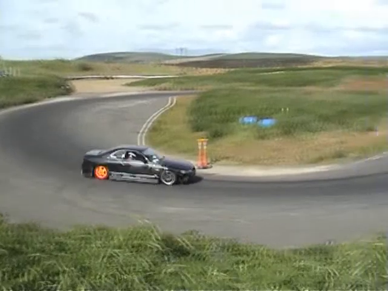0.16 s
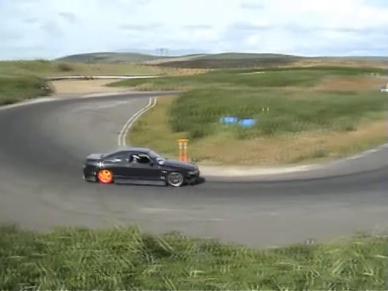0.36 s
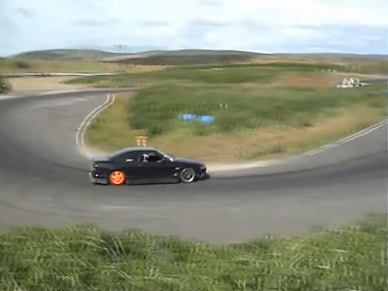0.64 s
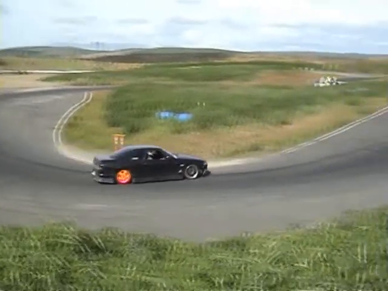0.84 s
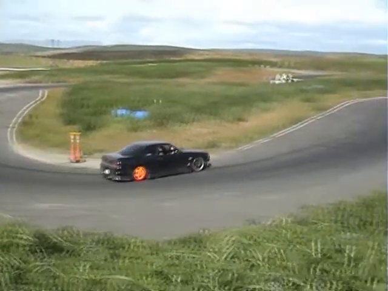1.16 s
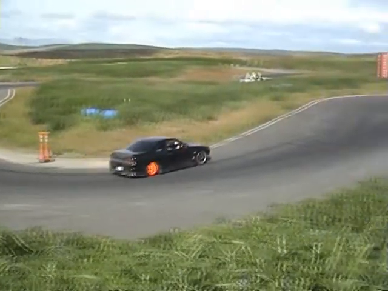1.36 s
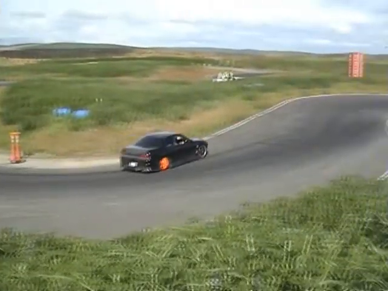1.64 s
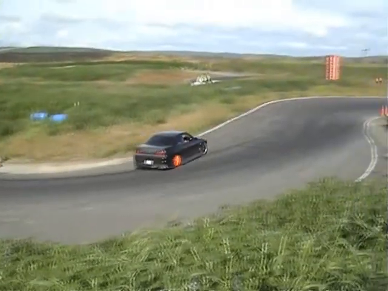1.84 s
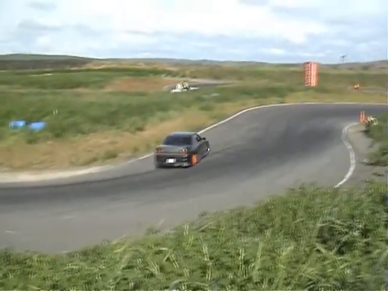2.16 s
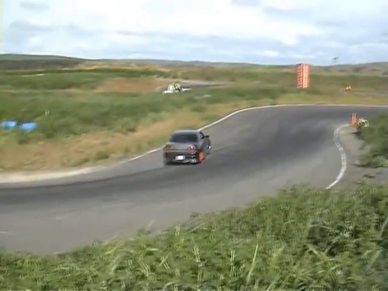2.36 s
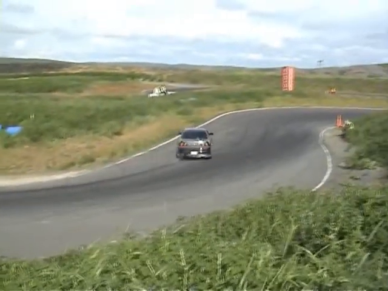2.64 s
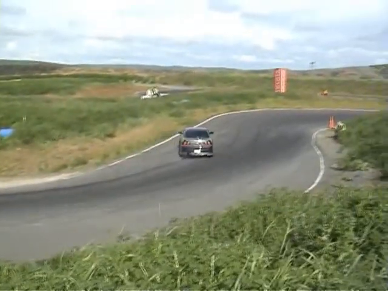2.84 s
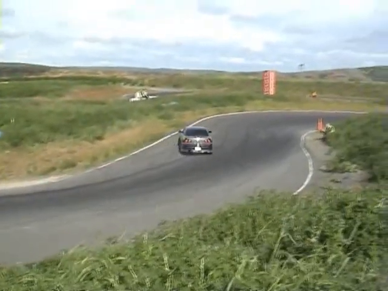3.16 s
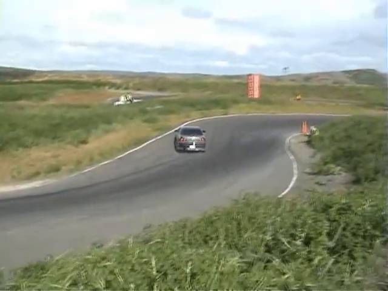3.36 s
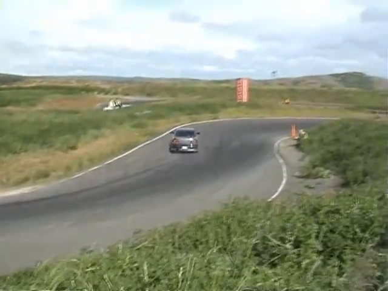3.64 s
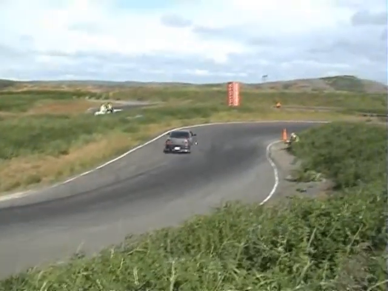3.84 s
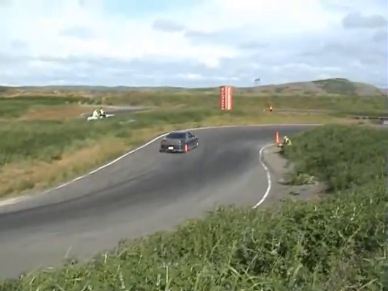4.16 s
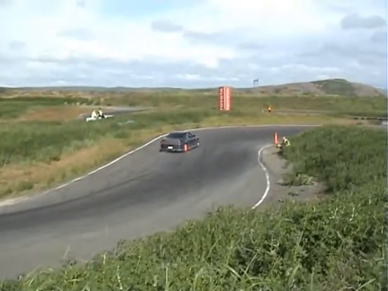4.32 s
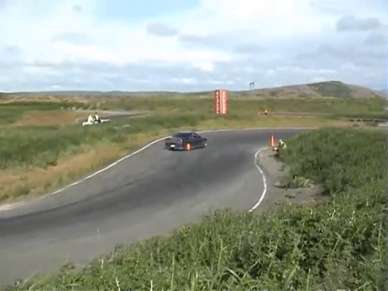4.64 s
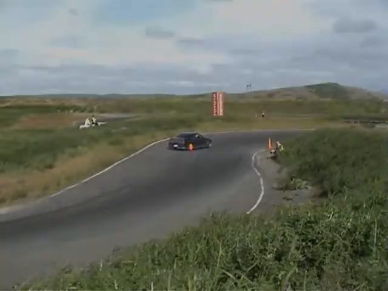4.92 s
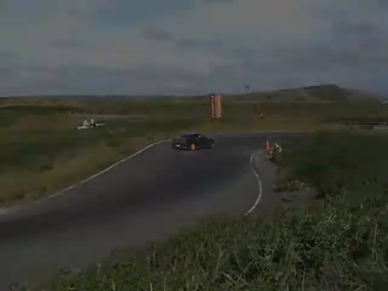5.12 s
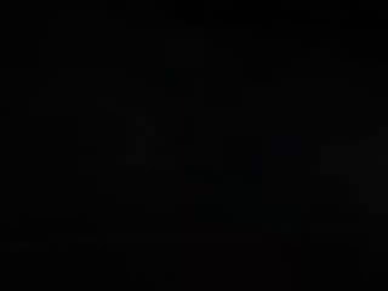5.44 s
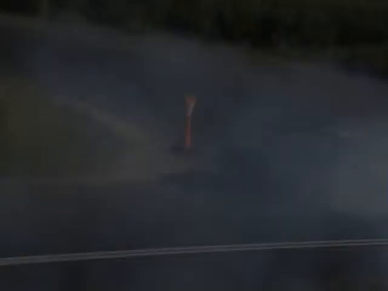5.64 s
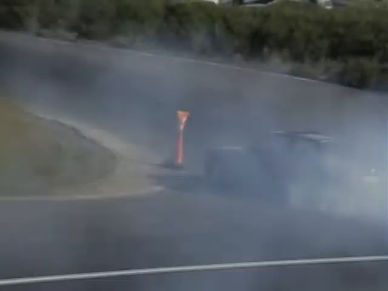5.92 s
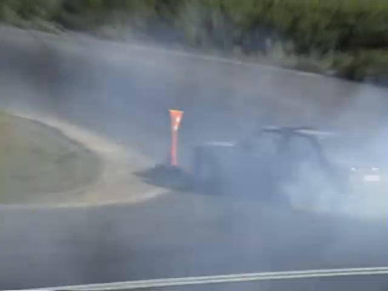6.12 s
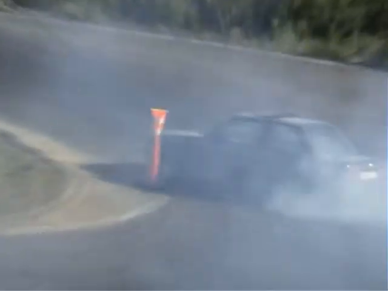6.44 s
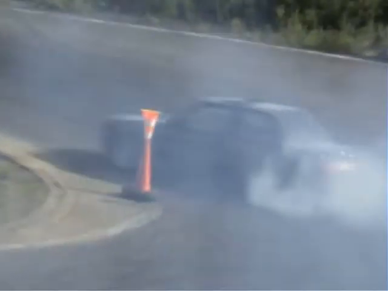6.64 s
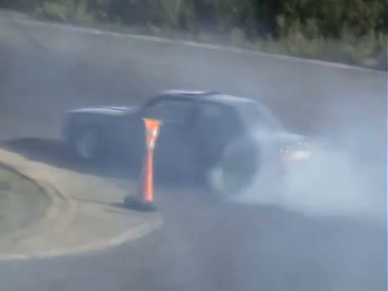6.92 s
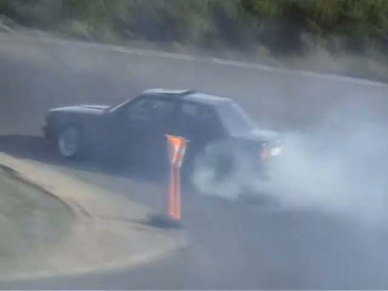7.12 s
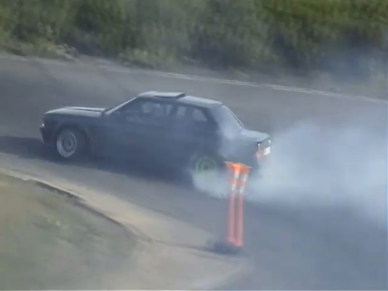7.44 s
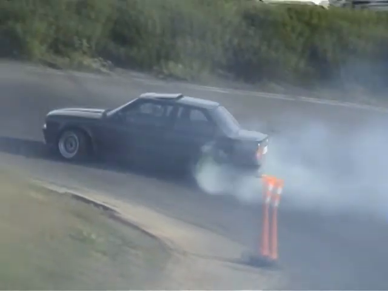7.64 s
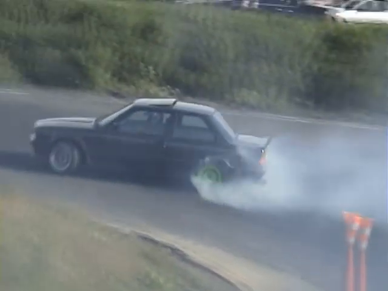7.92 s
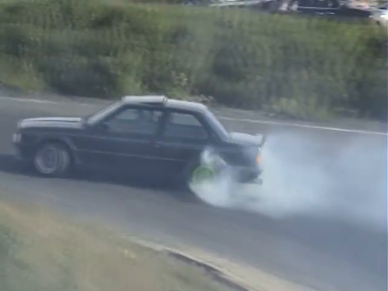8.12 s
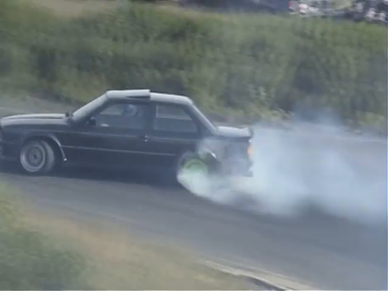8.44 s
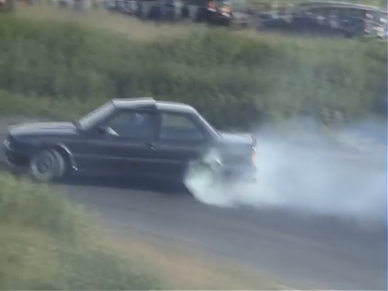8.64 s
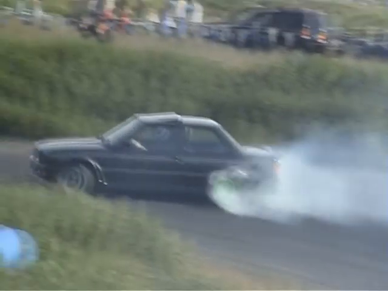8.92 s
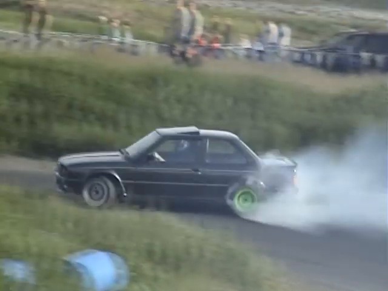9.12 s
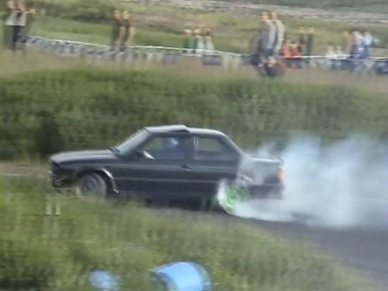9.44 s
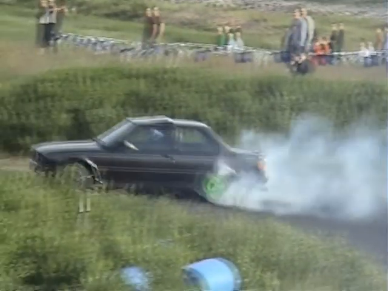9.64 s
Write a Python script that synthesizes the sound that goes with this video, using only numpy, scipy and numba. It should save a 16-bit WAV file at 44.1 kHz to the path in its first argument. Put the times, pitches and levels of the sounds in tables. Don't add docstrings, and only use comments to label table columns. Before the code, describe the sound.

Slowed, grainy tyre squeal and rising engine growl, then a fading burble with a squeak, a silent gap, and another squealing car at steady revs.

```python
import sys
import numpy as np
from scipy import signal
from scipy.fft import rfft, irfft, next_fast_len
from scipy.io import wavfile
from scipy.ndimage import uniform_filter1d, minimum_filter1d
from numba import njit

SR = 44100
rng = np.random.default_rng(int(sys.argv[2]) if len(sys.argv) > 2 else 0)


def volts(x):
    e = np.asarray(x, float) / 20
    return 10 ** e


def put_to_file(sound):
    columns = np.atleast_2d(sound).T
    safe = np.clip(columns, -1, 1)
    whole_steps = np.round(safe * 32767)
    wavfile.write(sys.argv[1], SR, whole_steps.astype(np.int16))


N = 430857
SLOW = 2
SHOT = N // SLOW + 2000
CUT_S = 5.442

# [f/Hz, level/dB]
WIND_COLOUR = [(12, -26), (25, -1.5), (60, -4.5), (100, -14.5), (200, -47.5)]
RUMBLE_COLOUR = [(30, -54.5), (60, -24.5), (100, -11.5), (140, -3), (200, -3.5), (300, -8), (500, -60)]
SPIN_COLOUR = [(150, -20), (300, -7), (450, -8), (700, 3.5), (1000, 4.5), (1300, -3), (1700, -14.5),
               (2500, -43)]
SLIDE_COLOUR = [(800, -32), (1300, -24.5), (1600, -0.5), (2000, -4), (2400, -6), (2900, -7), (3500, -16),
                (4500, -36), (6000, -67.5)]
HISS_COLOUR = [(2500, -27), (3600, -1.5), (4200, -3.5), (5500, -13), (7500, -14.5), (10500, -23.5),
               (12000, -31), (15500, -55)]
# [f/Hz, likeness/-1..1]
LIKENESS = [(40, -5), (70, -1.4), (130, 0.44), (550, 1.0), (1650, 1), (5000, 0.83), (15000, 0.81)]
# [t/s, half width/s, level/dB]
THUMPS = [(0, 0.13, 16), (.56, 0.06, 11.5), (2.1, 0.32, 9.5), (2.68, 0.19, 22.5), (2.87, 0.077, 8),
          (3.25, 0.078, 10), (3.6, 0.043, 5.5), (2.4, 0.045, 9.5), (3.97, 0.069, 12.5), (4.55, .25, -2),
          (6.82, 0.074, 1), (7.3, 0.38, 9.5), (7.75, 0.21, 6.5), (9.2, 0.11, 3), (9.48, 0.087, 12),
          (9.77, 0.045, 13)]
# [t/s, wheelspin level/dB, sideways slide level/dB]
RUBBER = [(0, -28.5, -32), (.6, -22, -31), (.9, -15.5, -22), (1.63, -13.5, -23), (2.1, -12.5, -20),
          (2.5, -11.5, -21.5), (2.62, -15, -22), (2.93, -21.5, -27), (3.35, -23.5, -29.5),
          (3.6, -19.5, -30.5), (3.85, -31, -35), (4.07, -27.5, -42), (4.85, -36, -46), (5.63, -35, -35),
          (6.3, -32, -31.5), (7.05, -23.5, -28), (7.6, -24.5, -28), (8.3, -28, -33.5), (8.75, -27.5, -32),
          (9.1, -31.5, -35), (9.77, -38, -35.5)]
HISS_AGAINST_SLIDE_DB = [-10.5, -15.5]
# [t/s, half width/s, level/dB]
GRIT_SPRAYS = [
    (.2, 0.038, 3),
    (2.0, 0.054, 0.5),
    (3.28, 0.041, 3.5),
    (6.06, 0.032, 6),
    (9.76, 0.036, 3),
]
# [t/s, half width/s, level/dB]
GRIT_PINGS = [
    (8.296, .012, 15),
    (8.39, 0.0064, 20),
    (8.545, 0.015, 29),
    (8.565, 0.0079, 25.5),
    (8.585, .01, 20),
    (8.61, 0.023, 24),
    (8.8, .025, 28),
]
PING_BAND_HZ = [7200, 9400]

# [t/s, half width/s, level/dB, f/Hz]
CHIRPS = [
    (4.555, 0.07, -22, 1390),
    (4.771, .07, -29, 1281),
    (4.76, .05, -34, 2080),
]
# [t/s, stick-slip f/Hz, squeal level/dB, bite = second partial over first level/dB]
FIRST_TYRES = [(0, 980, -20.5, -12), (.1, 1067, -14.5, -12.5), (.4, 1004, -13, -15.5),
               (.7, 998, -10.5, -14), (.9, 1012, -13, -7), (1.05, 1036, -8, -8.5), (1.42, 1029, -8, -11.5),
               (1.45, 947.6, -7, -10), (1.64, 965, -8, -10), (2.0, 964, -14, -5.5), (2.35, 956, -10, -7.5),
               (2.7, 950.8, -11.5, -7.5), (2.8, 957.2, -12.5, -2.5), (2.9, 972, -14.5, -3),
               (3.12, 935, -17, 3.5), (3.4, 932.5, -16, 1), (3.58, 937, -18.5, 8), (3.82, 1043, -21, 0),
               (3.93, 1008, -24, -2), (4.0, 1014, -42, -9)]
SECOND_TYRE_LOW = [(5.6, 965, -36, 10.5), (5.74, 972, -22, 4), (5.8, 977, -20, 0), (5.87, 975.9, -18, -3),
                   (5.95, 979.5, -14.5, -12), (6.02, 983, -14, -17), (6.07, 1004, -13, -4),
                   (6.14, 999, -21, -7), (6.3, 1007, -20.5, -2), (6.55, 988.3, -13.5, 3.5),
                   (6.72, 973, -15, -5), (6.9, 950, -12.5, -10.5), (7.08, 929.6, -20, 0),
                   (7.3, 976, -15.5, -1.5), (8.1, 1009, -14, -5.5), (8.6, 1034, -15.5, -13.5),
                   (8.75, 1027, -18, -4.5), (8.97, 1031, -19, 0), (9.1, 1027, -18, -5),
                   (9.22, 1032, -17, -9), (9.5, 1034, -23.5, -2.5), (9.6, 1040, -22, -4.5),
                   (9.77, 1043, -23.5, -15)]
SECOND_TYRE_HIGH = [(5.6, 1218, -36.5, -18), (5.7, 1200, -13.5, -13), (5.79, 1219, -28, -17),
                    (5.88, 1215, -18.5, -6), (6.02, 1202, -27.5, -21), (6.1, 1195, -15, -21),
                    (6.3, 1196, -16, -21), (6.5, 1200, -23.5, -6), (6.6, 1215, -21, -18),
                    (6.8, 1210, -16.5, -12), (6.99, 1198, -18.5, -12.5), (7.08, 1211, -19, 1.5),
                    (7.18, 1216, -22.5, 5), (7.22, 1226, -17, -11.5), (7.3, 1239, -14.5, -9),
                    (7.85, 1172, -24.5, -24), (8.3, 1204, -16, -36), (8.65, 1213, -24, -8)]
# [snap t/s, sag length/s, depth f/Hz,
# negative = rise]
SAGS = [(.38, .15, 45), (0.574, 0.18, 85), (0.637, 0.05, 44.5), (0.911, .13, 108.5), (1.096, 0.0891, 44.5),
        (1.326, 0.093, 51.5), (1.517, 0.071, 45), (0.668, 0.028, 44.5), (1.684, 0.034, -100),
        (1.768, 0.061, 31), (2.035, 0.061, 89.5), (1.823, 0.11, 35.5), (2.271, 0.11, 35),
        (2.586, 0.21, 94.5), (2.801, 0.17, 43.5), (3.044, 0.095, 67), (3.367, .14, 29)]
# [t/s, half width/s, level/dB]
TYRE_DIPS_AND_SWELLS = [(0.182, 0.039, -5), (.36, 0.011, 2.5), (0.461, 0.027, -3), (.58, 0.011, -1.5), (.88, 0.033, 0),
                        (.79, 0.041, 0), (1.54, 0.011, -3), (1.699, 0.029, -3.5), (2.04, .07, 2), (2.2, .05, -0.5),
                        (2.449, 0.024, -3), (2.61, 0.012, -7), (2.949, 0.014, -0.5), (3.045, 0.012, 0.5),
                        (3.351, 0.034, -1.5), (3.505, 0.031, -8.5), (3.62, 0.018, -2), (3.791, 0.028, -4.5),
                        (6.1, .015, -0.5), (7.799, 0.011, 1), (8.13, 0.018, -3), (8.574, 0.008, -6), (8.689, 0.0083, -7),
                        (8.93, 0.011, -3), (9.444, 0.01, -1), (9.65, .03, -0.5)]
# [t/s, share of pitch]
UNSTEADY = [(0, .011), (.8, .016), (1.0, .012), (1.5, .013), (1.8, .018), (2.15, .01), (2.5, .011),
            (2.75, .015), (2.95, .007), (4.9, .008), (5.6, .007), (9.77, .009)]

# [f/Hz, overtone level/dB]
FIRST_PIPE = [(60, -49.5), (150, -15), (300, -6.5), (450, -3), (620, 0), (800, -10.5), (1000, -24),
              (1400, -35.5), (2000, -52.5)]
AWAY_PIPE = [(60, -32), (150, -16.5), (270, -29.5), (330, -10.5), (390, -18.5), (450, -2), (520, -11),
             (590, 3), (670, -3), (770, -0.5), (900, -22), (1300, -16.5), (2000, -22.5), (2400, -33.5)]
SECOND_PIPE = [(150, -8), (260, 0), (340, -1.5), (510, 1), (690, -1), (860, -11), (1030, -5), (1200, -8),
               (1400, -14), (1700, -15), (2050, -15), (2400, -20), (3200, -26), (4800, -38)]
# [t/s, firing f/Hz, firing tone level/dB, overtones over tone level/dB]
FIRST_REVS = [(0, 171, -16.5, -10.5), (.41, 200, -15, -8), (.73, 216, -20, -5), (1.03, 244, -19.5, -0.5),
              (1.16, 243, -18.5, -6), (1.45, 239, -15.5, -1.5), (1.77, 252, -18.5, -5),
              (2.0, 274, -15.5, 6.5), (2.2, 282.5, -14.5, 5.5), (2.36, 294, -14, 1.5),
              (2.51, 294, -16.5, 3.5), (2.535, 290, -38.5, -6.5), (2.7, 255, -25.5, -13),
              (2.88, 262, -27, -6), (3.02, 243, -28, 2.5), (3.3, 235, -27.5, 6), (3.72, 237, -33.5, 4),
              (3.86, 250, -45, 3.5)]
# [t/s, firing f/Hz, firing tone level/dB, overtones over tone level/dB]
AWAY_REVS = [
    (3.74, 222.4, -38, -6),
    (3.82, 223.8, -26, 4),
    (3.93, 224.5, -20.5, -0.5),
    (4.16, 217.7, -23.5, 0.5),
    (4.34, 213.6, -24, -3.5),
    (4.53, 198.2, -27, -0.5),
    (4.85, 204.9, -31.5, 7.5),
]
# [t/s, firing f/Hz, firing tone level/dB, overtones over tone level/dB]
SECOND_REVS = [(5.6, 159.1, -26, -11.5), (5.8, 164.5, -23.5, -7), (6.2, 169.3, -23.5, -5.5),
               (6.54, 168.6, -23.5, -4.5), (7.08, 166.8, -23.5, 1.5), (7.21, 166, -25, 5.5),
               (7.87, 169.4, -16.5, -4), (8.27, 171.3, -17, -4.5), (8.49, 175.2, -17.5, -4),
               (8.75, 180.8, -16.5, -3.5), (8.95, 182, -17.5, -4), (9.32, 171.5, -28, -5),
               (9.46, 168.3, -18.5, -5.5), (9.77, 177.1, -16.5, -6.5)]
# [t/s, half width/s, level/dB]
ENGINE_DIPS_AND_SWELL = [(.575, .01, -19), (2.61, .022, -19), (3.045, .012, -8), (3.55, 0.0066, -10.5),
                         (.94, 0.0079, -10), (1.325, 0.014, -13), (1.97, .012, -3), (2.22, 0.013, -5),
                         (2.93, 0.025, -11), (3.355, 0.022, -11), (3.62, 0.026, 8), (4.31, 0.0096, -7.5)]
# [t/s, half width/s, share of speed]
SHUDDER = [
    (8.3, .15, .005),
    (9.2, .15, .006),
    (9.65, .2, .009),
]
# [t/s, half width/s, level/dB]
LUMPY = [
    (.25, .5, -11),
    (1.45, 0.48, 5),
    (2.65, 0.23, -20.5),
    (7.2, .4, 1),
    (8.5, 0.46, 10.5),
    (9.27, 0.25, 11),
]

# [t/s, level/dB]
LEFT_OVER_RIGHT = [(0, 0), (2.4, -1), (2.999, -1.5), (3.8, -1.5), (4.87, -1.5), (5.62, -3), (6.5, -3.5),
                   (7.5, -2.5), (9.77, -2.5)]
LOOP_MS = [9, 25]
# [from t/s, to t/s, loop/ms]
LOCKS = [(.32, .385, 5.1), (.56, .59, 4.8), (1.05, 1.078, 4), (2.6, 2.618, 2.1), (2.93, 2.965, 3.2),
         (3.038, 3.056, 2.2), (3.14, 3.158, 3.2), (3.335, 3.375, 2.15), (3.485, 3.51, 4.2),
         (3.545, 3.562, 2.1), (3.665, 3.685, 4.5), (3.775, 3.8, 4.5), (3.87, 4.5, 27), (4.58, 4.86, 15),
         (5.965, 5.99, 6.1), (6.12, 6.14, 5.9), (6.185, 6.21, 5.9), (7.795, 7.825, 6), (8.565, 8.59, 5.8),
         (8.675, 8.695, 5.5), (8.712, 8.742, 5.5), (8.92, 8.94, 5.6), (9.432, 9.455, 5.9),
         (9.543, 9.562, 5.8), (9.585, 9.7, 5.75), (9.72, 9.77, 5.65)]
# [from t/s, to t/s]
GAPS = [
    (4.852, 5.6245),
    (6.212, 6.3045),
    (6.3832, 6.3865),
    (6.4033, 6.39),
]
# [t/s, step level/dB]
SKIPS = [
    (1.3279, -5.5),
    (6.3866, -13.5),
    (6.4059, -16),
    (9.767, -19.5),
]


def rms_one(x):
    return x / np.sqrt(np.mean(x ** 2) + 1e-20)


def clock(at):
    return at * SLOW / SR


def humps(s, rows):
    return sum(size * np.exp(-((s - at) / width) ** 2) for at, width, size in rows)


def in_time(rows):
    s, *columns = np.transpose(rows)
    at = np.arange(int(s[0] * SR / SLOW), int(s[-1] * SR / SLOW))
    return at, [np.interp(clock(at), s, c) for c in columns]


def fine(rows):
    s, *columns = np.transpose(rows)
    at = np.arange(s[0], s[-1], .002)
    return [at] + [np.interp(at, s, c) for c in columns]


def at_hz(points, hz):
    f, db = np.transpose(points)
    return np.interp(np.log(hz), np.log(f), db)


def band(x, low_hz, high_hz):
    return signal.sosfilt(signal.butter(2, [low_hz, high_hz], "band", fs=SR, output="sos"), x)


def drift(rate, size):
    r = np.exp(-16 * np.pi * rate * SLOW / SR)
    slow = signal.lfilter([1], [1, -2 * r, r * r], rng.standard_normal(size // 8 + 4002))[4000:]
    return np.interp(np.arange(size) / 8, np.arange(len(slow)), rms_one(slow - slow.mean()))


def coloured(spectrum):
    size = next_fast_len(SHOT)
    hz = np.maximum(np.arange(size // 2 + 1) * SR / size, 1)
    alike = np.clip(at_hz(LIKENESS, hz), -1, 1)
    mid, side = rfft(rng.standard_normal((2, size))) * volts(at_hz(spectrum, hz))
    both = np.sqrt(1 + alike) * mid + np.sqrt(1 - alike) * side * [[1], [-1]]
    return rms_one(irfft(both, size)[:, :SHOT])


def wind(s):
    return volts(-66 + .8 * humps(s, THUMPS) + 1.5 * drift(3.4, SHOT)) * coloured(WIND_COLOUR)


def rumble(s):
    unsteady = coloured(RUMBLE_COLOUR) * volts(3.0 + 1.4 * drift(8.6, SHOT))
    return volts(-45.5 + humps(s, THUMPS)) * unsteady


def scrub(s):
    throb = drift(8.0, SHOT)
    spin = coloured(SPIN_COLOUR) * volts(3.3 + 1.8 * throb + 1.2 * drift(60, SHOT))
    slide = coloured(SLIDE_COLOUR) * volts(2 + 1.2 * throb + 1.8 * drift(60, SHOT))
    hiss = coloured(HISS_COLOUR) * volts(6.0 + 1.45 * throb + 0.99 * drift(150, SHOT))
    when, *levels = np.transpose(RUBBER)
    spin_db, slide_db = (np.interp(s, when, c) + .9 * humps(s, TYRE_DIPS_AND_SWELLS) for c in levels)
    usual_db = slide_db.mean()
    hiss_db = usual_db + 0.87 * (slide_db - usual_db)
    hiss_db = hiss_db + np.take(HISS_AGAINST_SLIDE_DB, 1 * (s > CUT_S)) + humps(s, GRIT_SPRAYS)
    pings = volts(-71.5 + humps(s, GRIT_PINGS)) * rms_one(band(hiss, *PING_BAND_HZ))
    return pings + volts(spin_db) * spin + volts(slide_db) * slide + volts(hiss_db) * hiss


def squeal(rows, slip, patches, flutter_db):
    at, levels_db = in_time(rows)
    wobble = np.interp(clock(at), *np.transpose(UNSTEADY))
    hz, out = np.interp(clock(at), *np.transpose(slip)), np.zeros(SHOT)
    for i, (ratio, db, patchy_db) in enumerate(patches):
        hops = np.tanh(9 * drift(11, len(at)))
        pitch = hz * ratio * (1 + wobble * (hops + 1.15 * drift(45, len(at))))
        phase = 2 * np.pi * np.cumsum(pitch) / SR
        flutter = .5 * drift(9, len(at)) + 130 * wobble * drift(50, len(at))
        grip = flutter_db * flutter + patchy_db * drift(4, len(at))
        grip = 7 * np.tanh(grip / 7) + np.minimum(grip, 0) / 2
        for k, level_db in enumerate(levels_db, 1):
            partial_db = level_db + db + grip * k ** 0.97 + 0.5 * k * drift(40, len(at))
            out[at] -= volts(partial_db) * np.cos(k * phase)
        if i == 0:
            levels_db = [v + 20 * np.log10(wobble / wobble.max()) for v in levels_db]
        hz = uniform_filter1d(hz, size=6000)
    return out


def chirp(at, width, db, hz):
    shape = [(-1.1, -90), (-0.8, db - 12), (-0.45, db), (0.49, db - 5), (1.13, db - 15), (1.5, -90)]
    rows = [(at + step * width, level_db) for step, level_db in shape]
    return squeal(rows, [(at, hz)], [(1, 3.5, .3), (.96, -5, 2.5), (1.035, -7, 2.5)], flutter_db=2.2)


def sliding(tyres, third_db):
    s, hz, db, bite_db = fine(tyres)
    db = db + humps(s, TYRE_DIPS_AND_SWELLS)
    bite_db = bite_db + .5 * humps(s, TYRE_DIPS_AND_SWELLS)
    for snap, length, depth in SAGS:
        hz = hz - np.interp(s, [snap - length, snap, snap + .02], [0, depth, 0])
    third_db = db + 1.34 * bite_db + third_db
    return np.transpose([s, db, db + bite_db, third_db, third_db - 21]), np.transpose([s, hz])


def rear_tyres():
    first = [(1, 5.6, .3), (.94, -6, 6.0), (1.09, -13, 6.0), (1.2, -17, 3.2)]
    out = squeal(*sliding(FIRST_TYRES, -7.0), first, flutter_db=1.4)
    out += squeal(*sliding(SECOND_TYRE_LOW, -16), [(1, -6.5, 1.06), (1.0, -21.5, 2.6)], flutter_db=1.5)
    out += squeal(*sliding(SECOND_TYRE_HIGH, -21), [(1, -5, 1.1), (1.04, -11.5, 5)], flutter_db=2.5)
    return out


def driven(revs, uneven_db):
    s, hz, tone_db, over_db = fine(revs)
    tone_db = tone_db + humps(s, ENGINE_DIPS_AND_SWELL)
    return np.transpose([s, hz, tone_db, tone_db + over_db, uneven_db + humps(s, LUMPY)])


def engine(rows, pipe, cylinders, count, half_db, rasp_db, rough, lean, shaky):
    at, (hz, tone_db, over_db, uneven_db) = in_time(rows)
    shake = .0018 + humps(clock(at), shaky)
    firings = np.cumsum(hz * (1 + shake * drift(22, len(at)))) / SR
    each = rng.standard_normal((int(firings[-1]) + 2, 2))
    strength, late = (np.interp(firings, np.arange(len(each)), c) for c in each.T)
    cycle = 2 * np.pi * (firings + 0.045 * rough * late) / cylinders
    pattern = rng.standard_normal((count * cylinders + 1, 2))
    over, uneven, coarse = 0, 0, hz[::64]
    steps = np.arange(len(coarse))
    for k in range(2, count * cylinders + 1):
        broken = np.interp(steps / 10, steps, rng.standard_normal(len(coarse)))
        patches_db = np.clip(.4 * k / cylinders - 1.6, 0, 2.5) * broken
        gain = np.repeat(volts(at_hz(pipe, coarse * k / cylinders) + patches_db), 64)[:len(at)]
        if k % cylinders:
            banks_db = half_db * (2 * k % cylinders == 0)
            line = np.sin(k * cycle + 9 * pattern[k, 1])
            uneven = uneven + gain * volts(banks_db + 2 * pattern[k, 0]) * line
        elif k > cylinders:
            smear = lean + pattern[k, 1] * np.clip(k / cylinders / 8 - 1, 0, 2)
            over = over + gain * np.sin(k * cycle - smear)
    jet = band(rng.standard_normal(len(at)), 1300, 5500)
    over = over + volts(rasp_db + 3.2 * strength) * jet * np.exp(-4.5 * (firings % 1))
    tone = volts(tone_db) * (1 + 0.97 * rough * strength) * np.sin(2 * np.pi * firings - lean + 0.37)
    upper = volts(over_db) * over + volts(uneven_db) * uneven
    out = np.zeros(SHOT)
    out[at] = np.sqrt(2) * (tone + (1 + rough * strength) * upper)
    return out


def engines():
    out = engine(driven(FIRST_REVS, -40.5), FIRST_PIPE, 6, count=6, half_db=12.0, rasp_db=-24,
                 rough=0.1, lean=0.33, shaky=[])
    out += engine(driven(AWAY_REVS, -29), AWAY_PIPE, 6, count=11, half_db=2.5, rasp_db=-24,
                  rough=0.14, lean=.3, shaky=[(4.7, .15, .006)])
    out += engine(driven(SECOND_REVS, -43), SECOND_PIPE, 2, count=22, half_db=-1, rasp_db=-16,
                  rough=0.1, lean=.75, shaky=SHUDDER)
    return out


@njit
def twice(x, loop, reach):
    out, heard, read = np.zeros((2, len(loop) + 4000)), 200, 200
    out[:, :200] = x[:, :200]
    while heard < len(loop):
        aim, best, piece = loop[heard], 1e9, 0
        near = min(reach, aim * 3 // 10)
        for size in range(min(aim - near, read - 1), min(aim + near, read)):
            misfit = np.abs(x[0, read:read + size:3] - x[0, read - size:read:3]).mean()
            if misfit < best:
                best, piece = misfit, size
        back = np.arange(piece) / piece
        out[:, heard:heard + piece] = (1 - back) * x[:, read:read + piece] + back * x[:, read - piece:read]
        out[:, heard + piece:heard + 2 * piece] = x[:, read:read + piece]
        heard, read = heard + 2 * piece, read + piece
    return out[:, :len(loop)]


def slowed(x):
    s = np.arange(N) / SR
    ms = rng.uniform(*LOOP_MS, 400)[(s * 40).astype(int)]
    for start, end, lock in LOCKS:
        before = np.minimum(ms, np.maximum((start - s) * 500, lock))
        ms = np.where(s < start, before, np.where(s < end, lock, ms))
    reach_ms = 3.0
    return twice(x, (ms * SR / 1000).astype(np.int64), int(reach_ms * SR / 1000))


def scene():
    s = clock(np.arange(SHOT))
    background = wind(s) + rumble(s) + scrub(s)
    cars = sum(chirp(*row) for row in CHIRPS) + rear_tyres() + engines()
    bright = signal.sosfilt(signal.butter(1, 150, "high", fs=SR, output="sos"), cars)
    echoes = np.array([np.roll(bright, int(delay * SR)) for delay in (.023, .031)])
    shimmer = volts(np.minimum(drift(15, SHOT), .6))
    heard = shimmer * (cars + volts(-17) * echoes + background)
    bass = signal.sosfilt(signal.butter(1, 400, fs=SR, output="sos"), heard)
    balance = volts(np.interp(s, *np.transpose(LEFT_OVER_RIGHT)) * [[.5], [-.5]])
    return slowed(bass + balance * (heard - bass))


def limiter(x):
    peak = -minimum_filter1d(-np.abs(x).max(axis=0), size=400)
    gain = np.minimum(.85 / (peak + 1e-9), 1) ** .75
    return x * uniform_filter1d(gain, size=300)


def band_limit(x):
    return signal.sosfilt(signal.butter(12, 15750, fs=SR, output="sos"), x)


def record(dry):
    steps = np.zeros(N)
    for s, db in SKIPS:
        steps[round(s * SR)] = volts(db)
    x = 2.5 * np.tanh(limiter(dry) / 2.5)
    x = x * np.minimum(np.abs(np.arange(N) / SR - CUT_S) / 1.0, 1)
    x = signal.sosfilt(signal.butter(6, 11800, fs=SR, output="sos"), x)
    x = x + signal.lfilter([1], [1, -.9], steps)
    for start, end in GAPS:
        x[:, round(start * SR):round(end * SR)] = 0
    x = signal.sosfilt(signal.cheby2(12, 60, 16300, fs=SR, output="sos"), x)
    return band_limit(np.clip(x, -1, 1))


dry = scene()
out = record(dry)
put_to_file(out)
```